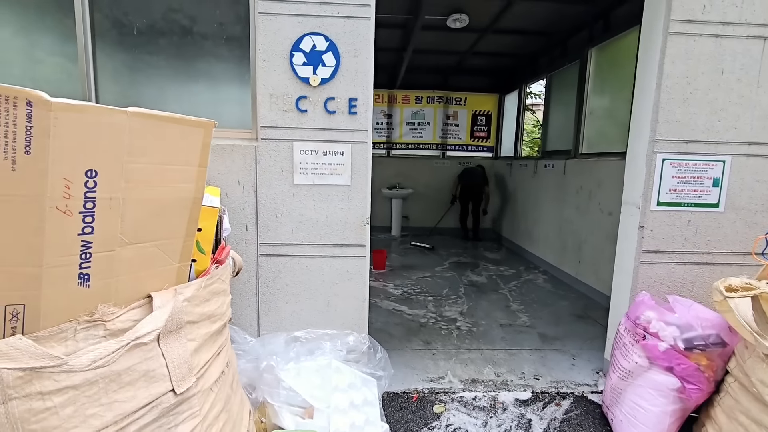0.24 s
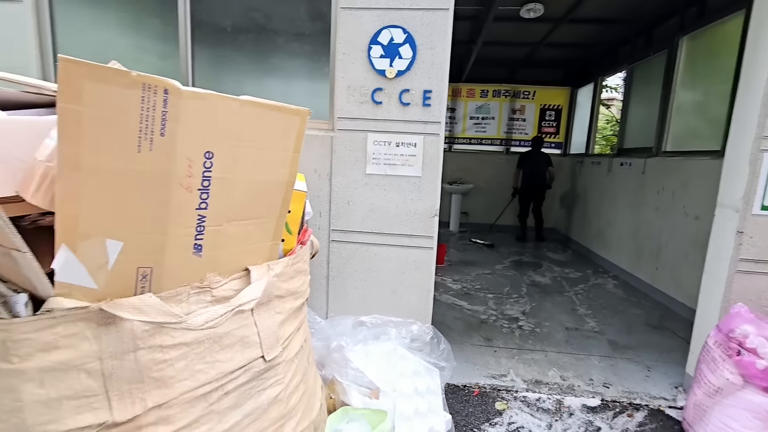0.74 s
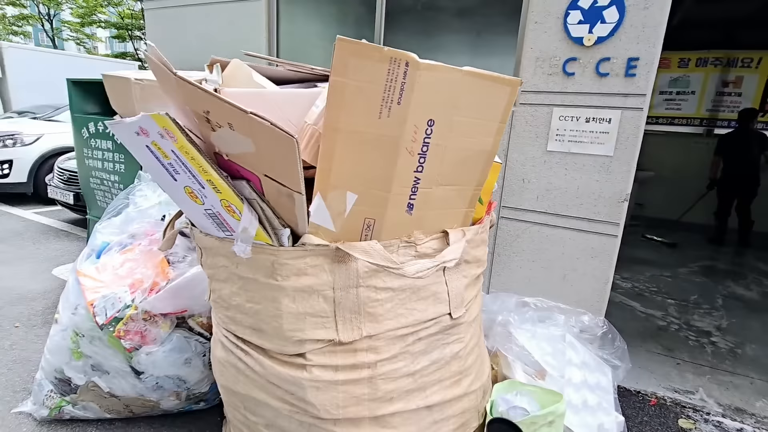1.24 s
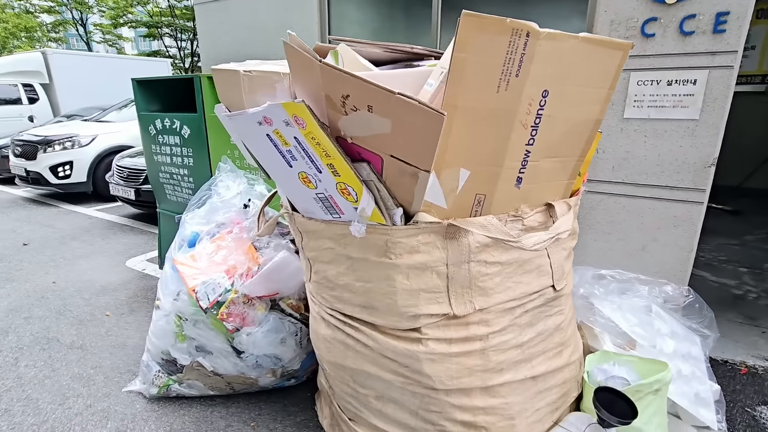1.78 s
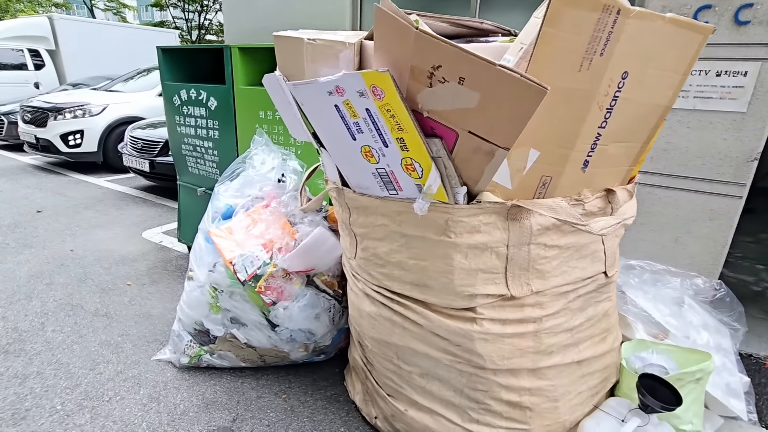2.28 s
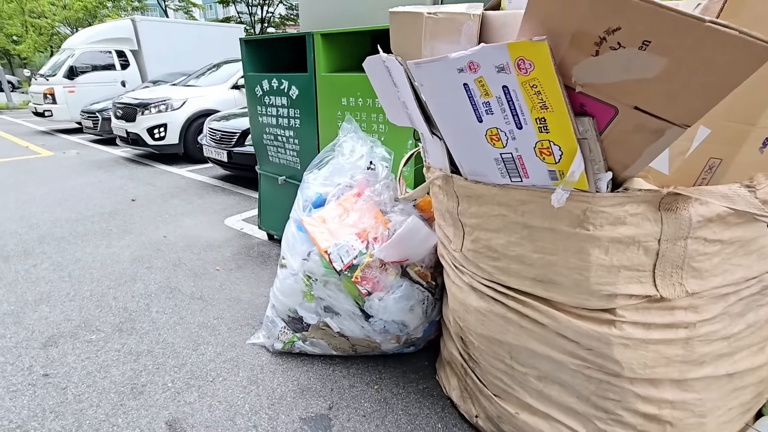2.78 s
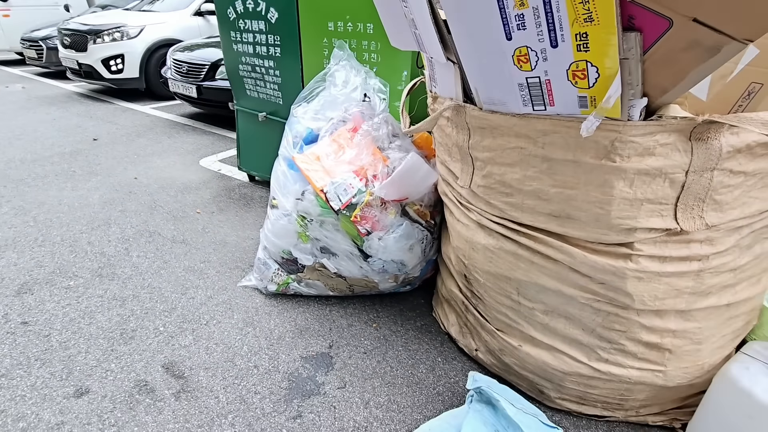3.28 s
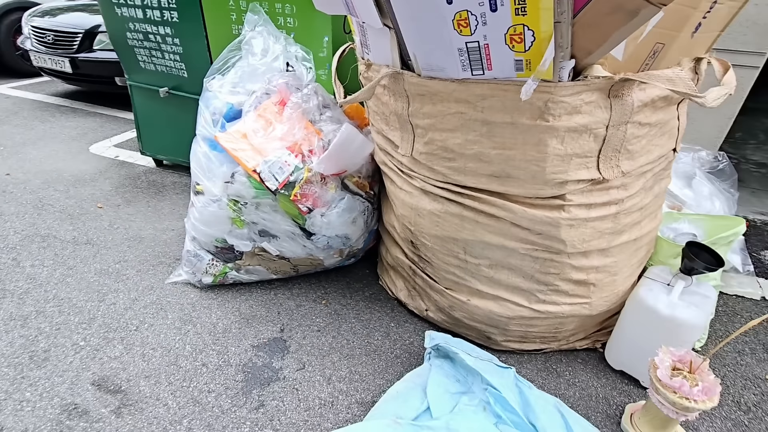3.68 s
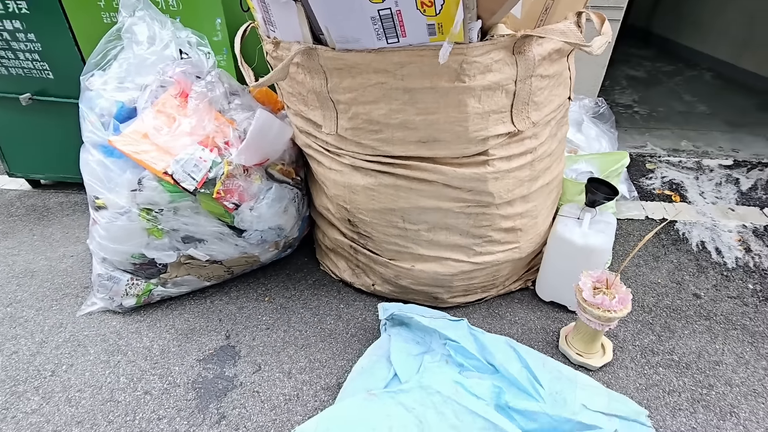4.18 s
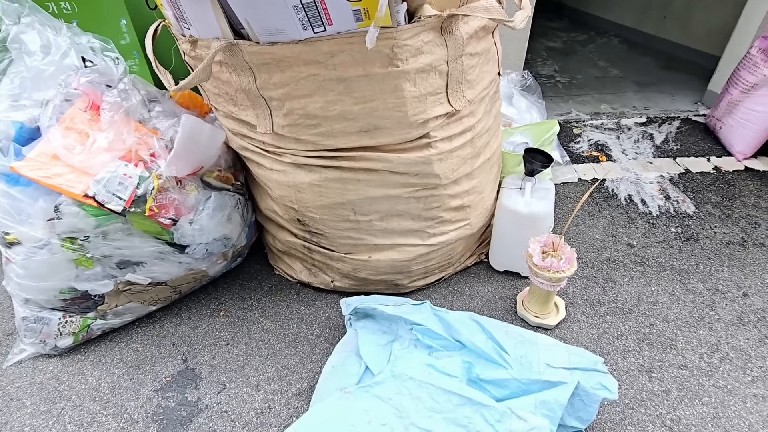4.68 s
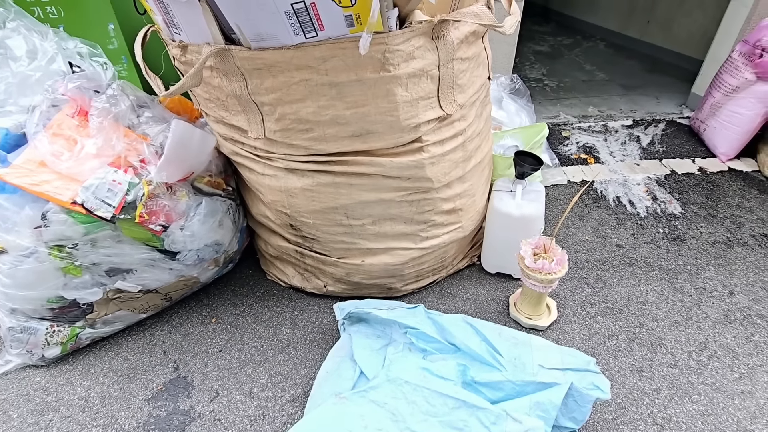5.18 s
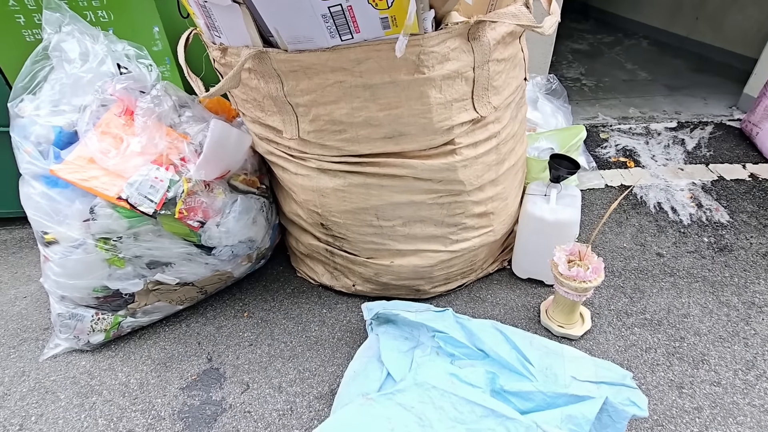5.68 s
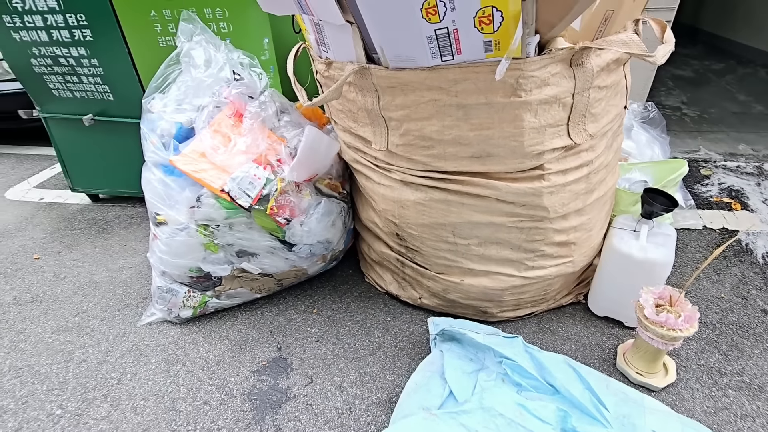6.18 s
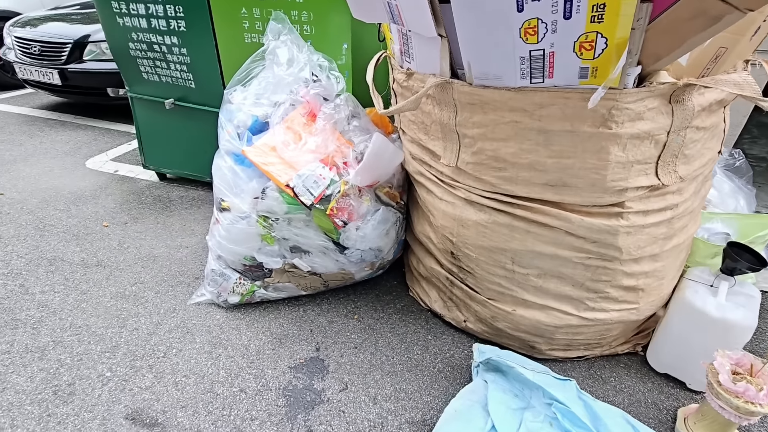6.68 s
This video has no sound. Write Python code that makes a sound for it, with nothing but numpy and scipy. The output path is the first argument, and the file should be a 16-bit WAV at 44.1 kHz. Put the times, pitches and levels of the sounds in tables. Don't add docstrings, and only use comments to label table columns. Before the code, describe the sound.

Hissing to-and-fro broom strokes on a wet concrete floor, with small wooden knocks, a bay echo and a deep urban hum.

```python
import sys
import numpy as np
from scipy import signal
from scipy.fft import rfft, irfft, next_fast_len
from scipy.io import wavfile
from scipy.ndimage import uniform_filter1d, map_coordinates

SR = 44100
rng = np.random.default_rng(int(sys.argv[2]) if len(sys.argv) > 2 else 0)


def unload_wav(signal):
    wavfile.write(
        sys.argv[1],
        SR,
        np.round(np.clip(np.atleast_2d(signal).T, -1, 1) * 32767).astype(np.int16),
    )


def how_loud(loudness_db):
    steps = np.asarray(loudness_db, float) / 20
    return 10 ** steps


N = 305965
T = np.arange(N) / SR

# [start t/s, length/s, peak level/dB, share of the length before the peak, grit level/dB]
STROKES = [(-0.2, 0.32, -54.5, .5, 0), (0.054, 0.31, -53, 0.29, -3), (0.315, 0.26, -55.5, 0.37, -3),
           (0.545, 0.35, -51.5, 0.41, -2.5), (0.843, 0.33, -52.5, 0.36, -5), (1.13, 0.43, -50, 0.39, -3.5),
           (1.507, 0.41, -50.5, 0.38, -5), (1.881, 0.44, -47.5, 0.43, -5), (2.274, 0.46, -49.5, 0.38, -5),
           (2.694, 0.45, -46, 0.45, -5.5), (3.123, 0.48, -48.5, 0.36, -4.5),
           (3.542, 0.52, -45.5, 0.48, -3.5), (4.027, 0.48, -45.5, 0.42, -5.5),
           (4.454, 0.48, -44.5, 0.47, -4), (4.887, 0.46, -46, 0.42, -5), (5.314, 0.45, -44, 0.51, -2.5),
           (5.776, 0.45, -49, 0.29, -2), (6.27, 0.43, -67.5, 0.66, -6), (6.792, .3, -61, 0.31, -6)]
# [t/s, left port lag/samples, left treble shade level/dB]
TURN = [(0, 4.6, -1.5), (.7, 3.4, -1), (1.2, 15.4, -5), (1.8, 14.6, -4.5), (2.7, 13.6, -9.5),
        (3.3, 19, -11), (3.8, 15.8, -6.5), (4.3, 13.8, -5), (4.8, 8.1, -4), (5.3, 9.8, -4.5), (6, 15, -5),
        (6.94, 13, -9.5)]


def unit(x):
    return x / np.sqrt(np.mean(x ** 2) + 1e-20)


def along(points, hz):
    f, value = np.transpose(points)
    return np.interp(np.log(hz + 1), np.log(f + 1), value)


def curves(rows):
    s, *columns = np.transpose(rows)
    return [np.interp(T, s, column) for column in columns]


def wobble(rate):
    return map_coordinates(rng.standard_normal(400), [T * rate], mode="wrap")


def filtered(x, response):
    m = next_fast_len(N + SR // 2)
    return irfft(rfft(x, m) * response(np.fft.rfftfreq(m, 1 / SR)), m)[..., :N]


def coloured(x, spectrum):
    return unit(filtered(x, lambda hz: how_loud(along(spectrum, hz))))


def patchy(x, patchy_db):
    z = signal.stft(x, nperseg=512)[2]
    field = uniform_filter1d(rng.standard_normal(z.shape[-2:]), size=6, axis=0)
    field = uniform_filter1d(field, size=10, axis=1)
    return signal.istft(z * how_loud(patchy_db * unit(field)), nperseg=512)[1][..., :N]


def ports(shared, apart):
    # [f/Hz, left-right likeness]
    likeness = [(30, 0.68), (70, 1), (150, 0.9), (290, 0.84), (800, 0.2), (1550, 0.52), (3000, 0.26),
                (15000, 0.055)]
    late = map_coordinates(shared, [np.arange(N) - curves(TURN)[0]], mode="nearest")
    alike = lambda hz: np.clip(along(likeness, hz), 0, 1)
    direct = filtered(np.array([late, shared]), lambda hz: np.sqrt(alike(hz)))
    diffuse = filtered(apart, lambda hz: np.sqrt(1 - alike(hz)))
    return direct + diffuse


def flicks(scatter_db):
    sizes = np.clip(rng.standard_normal((3, N)), -3, 3)
    snaps = unit(rng.standard_normal((3, N)) * how_loud(scatter_db * sizes))
    snaps = patchy(snaps, patchy_db=1.3)
    return ports(snaps[0], snaps[1:])


def strokes(law, lean_db):
    start, length, _, share = np.array(STROKES)[:, :4, None].transpose(1, 0, 2)
    coarse_t = T[::64]
    progress = np.clip((coarse_t - start) / length, 0, 1)
    bend = np.log(.5) / np.log(np.clip(share, .1, .9))
    speed = np.abs(np.sin(np.pi * progress ** bend)) * (progress < 1)
    turning = .25 * np.exp(-((coarse_t - start) / 0.062) ** 2)
    return np.hypot(speed, turning) ** law * how_loud(lean_db * (progress - .5))


def played(gains, peak_db):
    return np.interp(T, T[::64], np.linalg.norm(gains * how_loud(peak_db)[:, None], axis=0))


def brush():
    # [f/Hz, density level/dB per Hz]
    hiss_spectrum = [(2500, -120), (4000, -47), (5000, -11.5), (5400, 1.5), (5800, 1), (7500, 2),
                     (9200, 2.5), (10300, -2.5), (11200, -49), (14000, -120)]
    grit_spectrum = [(1700, -40), (2200, -11), (2700, -10), (3050, -1.5), (4300, 0), (5000, -1),
                     (5900, -30), (8000, -120)]
    spray_spectrum = [(6000, -120), (9300, -30), (10400, -2), (11000, -3.5), (11900, 0), (13100, 0),
                      (14500, 0), (16500, 0)]
    scrape_spectrum = [(700, -5), (1100, 1.5), (1500, 4.5), (2200, 0.5), (2900, -1.5), (3600, -24),
                       (5000, -120)]
    _, _, peak_db, _, grit_db = np.transpose(STROKES)
    uneven = how_loud(0.13 * wobble(8.7) + 0.32 * wobble(30))
    tips = flicks(scatter_db=2.0)
    hiss = played(strokes(law=1.39, lean_db=0), peak_db) * coloured(tips, hiss_spectrum)
    grit = played(strokes(law=1.26, lean_db=3.5), peak_db + grit_db) * coloured(tips, grit_spectrum)
    spray = played(strokes(law=1.53, lean_db=-2), peak_db + 2.5) * coloured(tips, spray_spectrum)
    scrape_db = np.minimum(-57.5 + 0.11 * (peak_db + 46.5), peak_db + 2.5)
    drag = coloured(flicks(scatter_db=5.5), scrape_spectrum)
    scrape = played(strokes(law=0.61, lean_db=0), scrape_db) * drag
    return uneven * (hiss + grit + spray + scrape)


def bay(x):
    # [f/Hz, t60/s]
    decay_times = [(300, 0.82), (2000, 1), (8000, 0.99), (15000, 0.59)]
    hz, t, z = signal.stft(rng.standard_normal((2, SR // 2)), SR, nperseg=256)
    decay = how_loud(-60 * t / along(decay_times, hz)[:, None])
    tail = signal.istft(z * decay, SR, nperseg=256)[1]
    return signal.fftconvolve(x, tail / np.linalg.norm(tail[0]), axes=1)[:, :N]


def clatter():
    # [centre f/Hz, width/Hz, level/dB]
    modes = [
        (657, 81, 0),
        (990, 360, -4),
        (1430, 550, -5),
        (3000, 270, -6.5),
        (3770, 650, -16),
    ]

    def ringing(f):
        total = 0
        for k, (centre, width, db) in enumerate(modes):
            damping = 1j * f * width
            total = total + (-1) ** k * how_loud(db) * damping / (centre * centre - f * f + damping)
        return total

    decay = how_loud(-41.0 - 60 * T / 0.95)
    return decay * unit(filtered(rng.standard_normal((2, N)), ringing))


def yard():
    # [t/s, traffic level/dB, lean from hum towards drone/dB]
    course = [(0, -41, -0.5), (.3, -42.5, -2.7), (.55, -39.5, 0.5), (.85, -40.5, 0), (1.3, -38.5, 0),
              (1.7, -37, -0.8), (2.15, -38, -.5), (2.65, -40, 1.3), (3.2, -34, 2.5), (3.8, -38, -2.5),
              (4.2, -36.5, 1.2), (4.6, -40, -1.8), (5.0, -39.5, 0.5), (5.4, -39, 3), (5.85, -39, 2.5),
              (6.25, -36, -2), (6.6, -37, -1.9), (6.94, -38, -1)]
    # [t/s, half length/s, lift level/dB]
    passes = [
        (1.6, .5, 0.5),
        (2.9, .15, 1),
        (4.15, 0.14, 1.8),
        (5.606, 0.24, 4.5),
        (6.7, 0.32, 3),
    ]
    # [level over the mean/dB, follows traffic, follows lean, follows passes, own flutter/dB]
    layer_mix = [
        (-1.5, 1.16, -.6, 0.11, -0.04),
        (-5, 0.85, 0.79, .1, 1.67),
        (-6.5, 0.7, -0.49, 0.84, 1.8),
        (-15, 0.091, 0.081, 0.23, 1.5),
    ]
    # [f/Hz, density level/dB per Hz]
    hum_spectrum = [(60, -120), (120, -34), (160, -0.5), (205, 3.5), (255, -1), (330, -44.5), (600, -120)]
    drone_spectrum = [(100, -120), (200, -37), (260, -0.5), (320, -4.5), (410, -7), (470, -10.5),
                      (600, -21.5), (1200, -120)]
    rumble_spectrum = [(10, -62), (25, -10), (45, -3.5), (70, -3), (120, -1.5), (160, -1), (210, -37),
                       (400, -120)]
    murmur_spectrum = [(260, -31), (450, -4), (538, -8), (644, -5), (745, -8.5), (1880, -26), (2200, -21.5),
                       (2860, -41), (4840, -120)]
    haze_spectrum = [(900, -90), (1300, -5), (1900, -12), (3000, -6), (5300, -6), (6200, -13), (9300, -10),
                     (10800, -18), (16500, -16.5)]

    def air():
        return ports(rng.standard_normal(N), rng.standard_normal((2, N)))

    traffic_db, lean_db = curves(course)
    mean_db = traffic_db.mean()
    pass_db = sum(db * np.exp(-((T - s) / half) ** 2) for s, half, db in passes)
    out = how_loud(-61.5) * coloured(air(), haze_spectrum)
    spectra = (hum_spectrum, drone_spectrum, rumble_spectrum, murmur_spectrum)
    for (db, swells, leans, lifts, flutter_db), spectrum in zip(layer_mix, spectra):
        level_db = mean_db + db + swells * (traffic_db - mean_db) + leans * lean_db
        level_db = level_db + lifts * pass_db + flutter_db * wobble(2.99)
        out += how_loud(level_db) * coloured(air(), spectrum)
    return out


def knocks():
    # [t/s, peak level/dB, body f/Hz, tick level/dB, left-right level/dB]
    taps = [(0.324, -55, 854, -10, -0.5), (0.553, -45, 807, -17, 7), (1.427, -47, 824, -3, 8),
            (1.442, -44, 690, -39, 2), (3.984, -41, 1290, -12, 2), (4.01, -40, 940, -16, -5),
            (4.164, -50, 900, -12, -3), (4.205, -39, 1060, -12, 3), (4.226, -42, 770, -18, -4),
            (4.168, -39, 450, -27, 5), (4.19, -39.5, 436, -30, 0.1), (4.252, -52, 477, -30, -4),
            (0.65, -41, 1550, -14, -2), (6.125, -37, 1270, -15, 2), (6.132, -42, 1160, -15, -4),
            (6.582, -52.5, 930, -3, 7), (6.829, -45, 844, -2.5, 1)]
    out, t = np.zeros((2, N + SR)), np.arange(SR // 20) / SR
    for s, db, hz, tick_db, pan_db in taps:
        fade = how_loud(-60 * t * hz / 11.7) * (1 - np.exp(-t / .0004))
        body = sum(np.sin(2 * np.pi * ratio * hz * t) for ratio in (.5, .75, 1, 1.35, 1.7))
        tick_hz = np.geomspace(1900, 5800, num=9) * rng.uniform(.95, 1.05, size=9)
        phase = rng.uniform(0, 2, size=(9, 1))
        tick = how_loud(tick_db) * np.sin(2 * np.pi * np.outer(tick_hz, t) + phase).sum(axis=0)
        gain = how_loud(db - 0.1 + np.array([[pan_db], [-pan_db]]) / 2)
        out[:, round(s * SR):][:, :len(t)] += gain * (body + tick) * fade
    return out[:, :N]


def puffs():
    # [t/s, level/dB, f/Hz, length/s]
    pushes = [
        (3.119, -23, 58, .014),
        (3.168, -30, 45, .02),
        (3.22, -35, 40, .03),
    ]
    push = np.zeros(N)
    for s, db, hz, length in pushes:
        push -= how_loud(db) * np.cos(2 * np.pi * hz * (T - s)) * np.exp(-((T - s) / length) ** 2)
    return push * how_loud([[-18], [0]])


def scene():
    scrub = brush()
    taps = knocks()
    direct = scrub + taps
    echo = how_loud(-6.5) * bay(scrub) + how_loud(-4) * bay(taps)
    return direct + echo + clatter() + yard() + puffs()


def band_limit(x):
    return signal.sosfilt(signal.butter(12, 16610, fs=SR, output="sos"), x)


def record(dry):
    # [f/Hz, level/dB]
    port_colour = [(60, 0.4), (300, -0.3), (1200, 0.7), (3000, -0.1), (4500, -2), (6000, 0), (9600, 1),
                   (10300, -2), (11000, -6.5), (12000, -10.5), (13200, -0.5), (14600, -9.5), (16000, 0)]
    top = filtered(dry, lambda hz: 1 / (1 + (10500 / (hz + 1)) ** 30))
    shade_db = curves(TURN)[1] + 4.2
    heard = dry + top * (how_loud([shade_db, -.3 * shade_db]) - 1)
    colour = lambda hz: how_loud(np.outer([.5, -.5], along(port_colour, hz))) * (hz < 15520)
    closing = np.clip((T[-1] - T) / .004, 0, 1)
    return band_limit(filtered(heard * closing, colour))


dry = scene()
out = record(dry)
unload_wav(out)
```